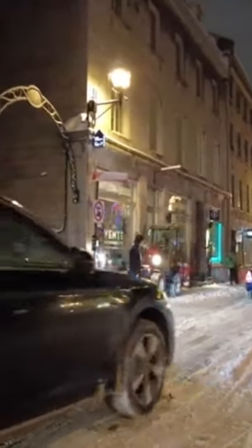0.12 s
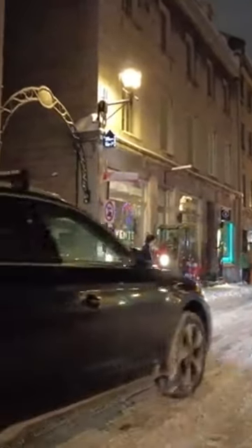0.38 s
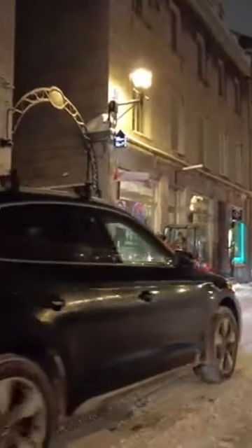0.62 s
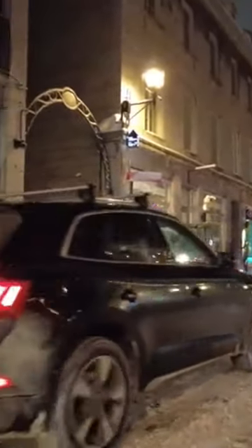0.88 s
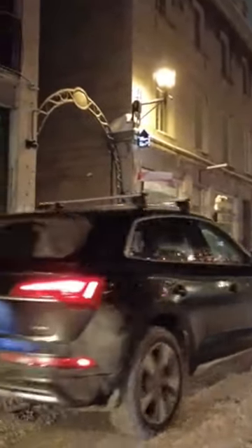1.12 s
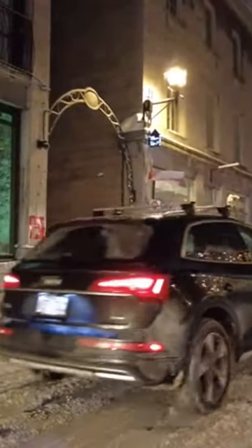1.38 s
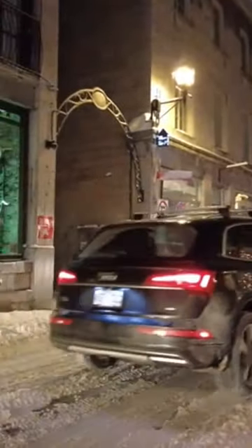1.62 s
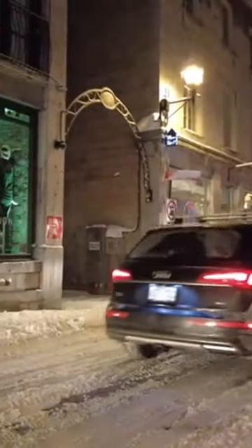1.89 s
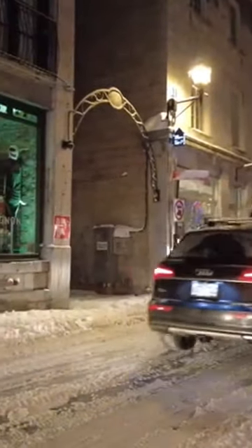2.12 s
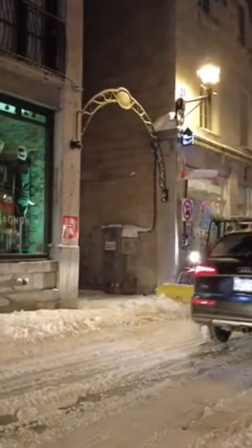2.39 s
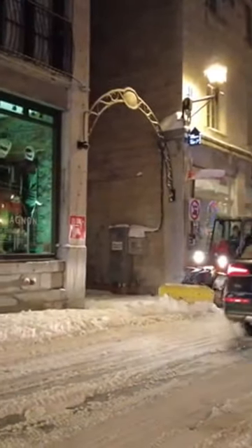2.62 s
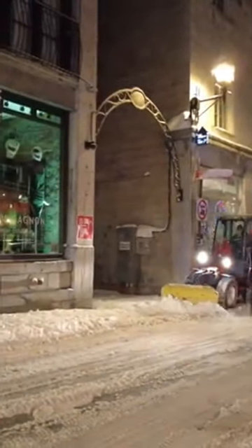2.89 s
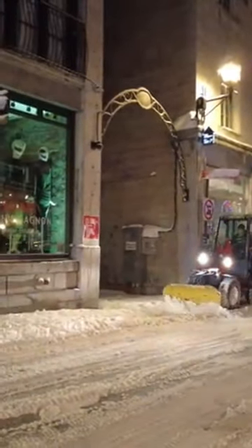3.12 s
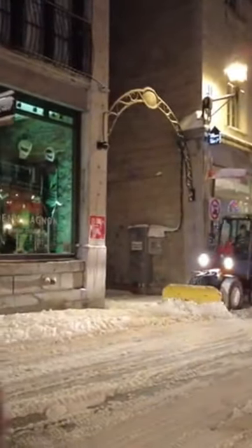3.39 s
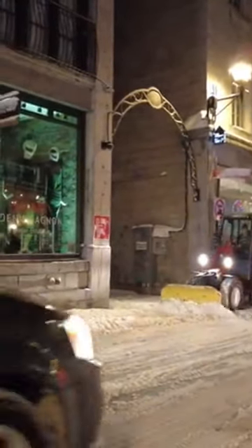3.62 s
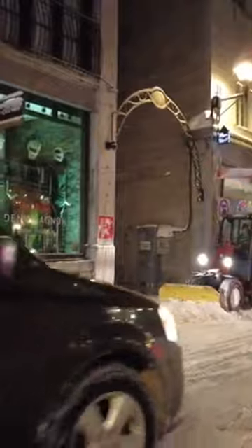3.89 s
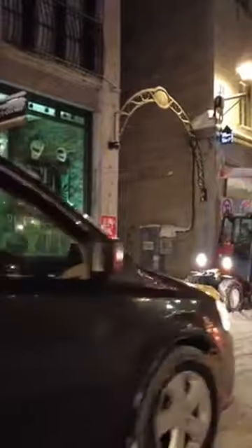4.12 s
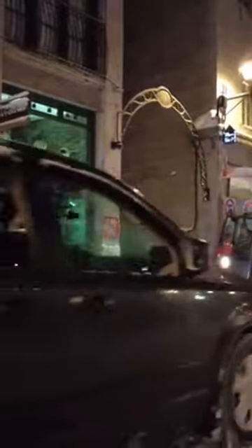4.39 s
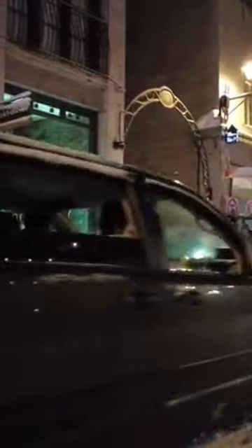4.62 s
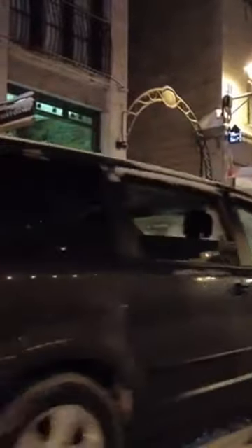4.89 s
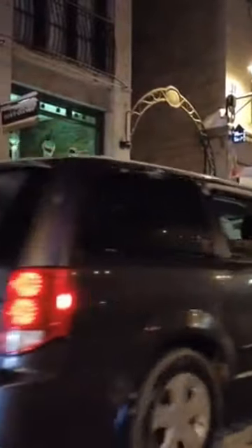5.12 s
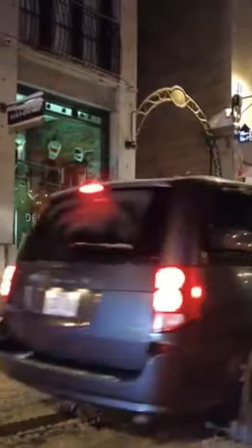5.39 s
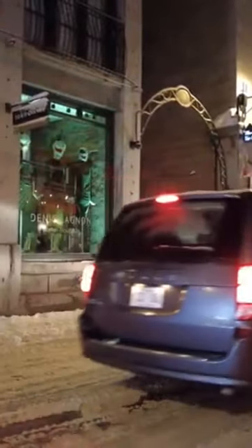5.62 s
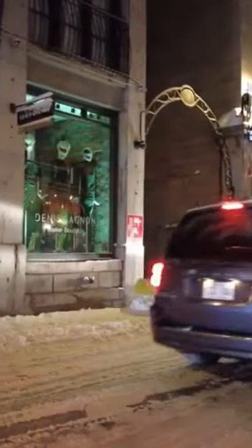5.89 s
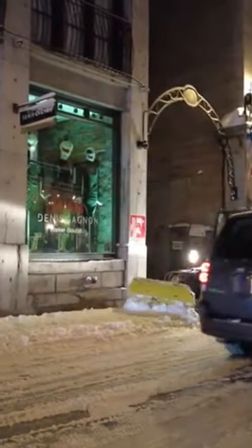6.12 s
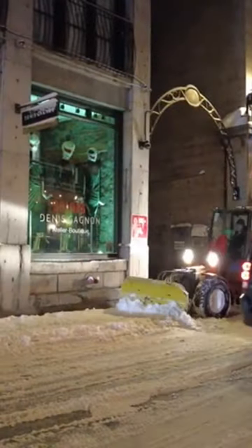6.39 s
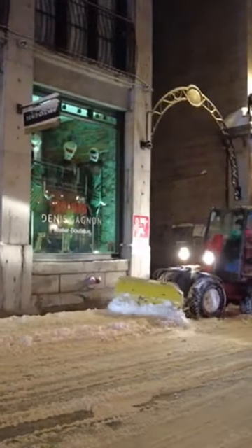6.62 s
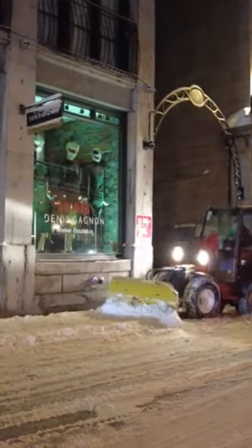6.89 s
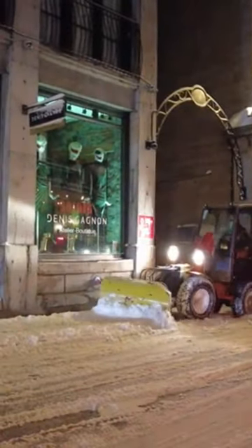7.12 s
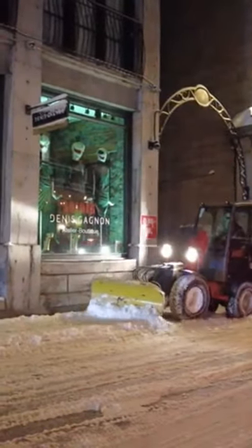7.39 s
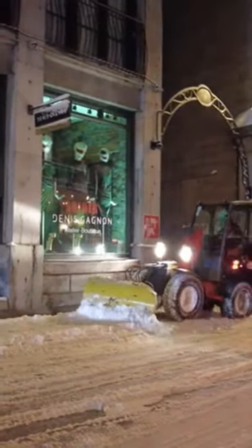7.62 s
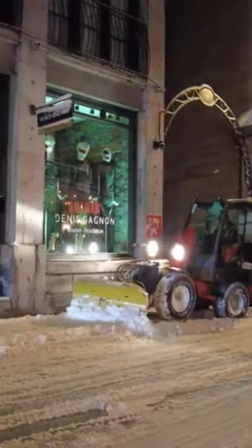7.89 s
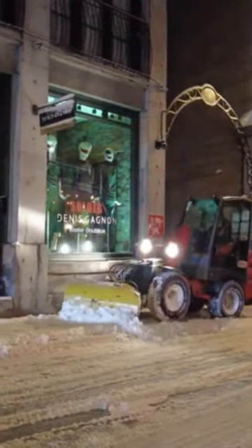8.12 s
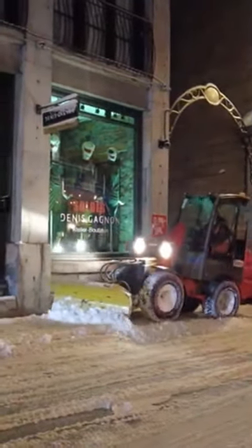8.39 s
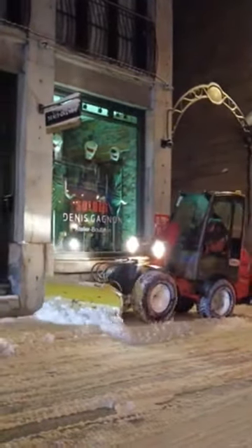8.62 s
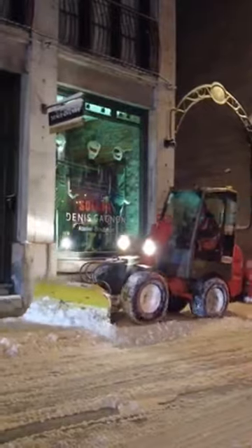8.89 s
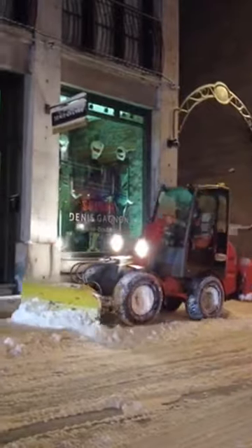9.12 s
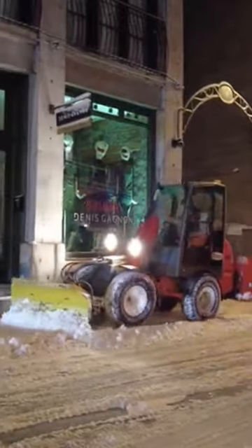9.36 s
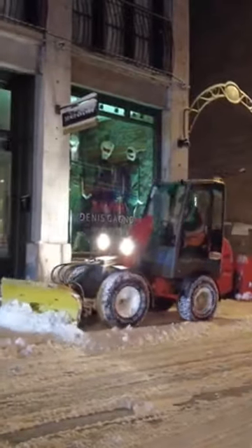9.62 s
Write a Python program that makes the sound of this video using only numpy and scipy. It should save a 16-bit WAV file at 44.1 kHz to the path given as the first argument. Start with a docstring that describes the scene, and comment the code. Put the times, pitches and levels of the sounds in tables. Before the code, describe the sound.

A small diesel plow tractor drones low and steady, clattering nearer over crunching snow while two cars roll closely past on a rumbling street.

```python
"""Snowy pavement between stone walls: a small plow tractor works its way along while two cars roll past.
The exhaust drones in sines on the firing rate and its multiples, over a growl of banded noise.
Noise in step with the firing rings as block clatter; short scrapes ring the steel as the blade knocks the kerb.
Random snaps and hiss make the snow crunch; low banded noise is the street rumble.
Wandering low sines are the first car's idle, a gliding narrow noise is the second car's tyre hum."""
import sys
import numpy as np
from scipy import signal
from scipy.fft import rfft, irfft, next_fast_len
from scipy.io import wavfile

SR = 44100
rng = np.random.default_rng(int(sys.argv[2]) if len(sys.argv) > 2 else 0)


def bounce(signal):
    """Save signal as a 16-bit WAV file at the path given by the first command-line argument."""
    frames = np.transpose(np.atleast_2d(signal))
    limited = np.clip(frames, -1, 1)
    pcm = np.round(limited * 32767).astype(np.int16)
    wavfile.write(sys.argv[1], SR, pcm)


def ratio_of_db(decibels):
    """Turn decibels (scalar or array-like) into linear amplitude factors; 0 dB maps to 1."""
    return 10 ** (np.asarray(decibels, float) / 20)


N = 429975


def rms_one(x):
    """Scale to rms 1."""
    return x / np.sqrt(np.mean(x ** 2) + 1e-20)


def in_time(rows):
    """Columns of a time table, interpolated to every sample."""
    t_s, *columns = np.transpose(rows)
    return [np.interp(np.arange(N) / SR, t_s, column) for column in columns]


def at_hz(points, hz):
    """Value of a frequency table, interpolated on log frequency."""
    table_hz, values = np.transpose(points)
    return np.interp(np.log(hz), np.log(table_hz), values)


def drift(rate_hz):
    """Slow chance of rms 1: noise at every 40th sample through a double one-pole low-pass."""
    r = np.exp(-80 * np.pi * rate_hz / SR)
    noise = rng.standard_normal(N // 40 + 2002)
    slow = signal.lfilter([1], [1, -2 * r, r * r], noise)[2000:]
    return np.interp(np.arange(N) / 40, np.arange(len(slow)), rms_one(slow))


def swelling(rest_db, rows):
    """Resting level plus swells, in dB; swell power is quartered one rise before and one fall after its top."""
    t_s, power = np.arange(0, N + 40, 40) / SR, 0
    for top_s, db, rise_s, fall_s in rows:
        away = (t_s - top_s) / np.where(t_s < top_s, rise_s, fall_s)
        power = power + ratio_of_db(db) ** 2 / (1 + away ** 2) ** 2
    swells = np.interp(np.arange(N) / SR, t_s, power)
    return 10 * np.log10(ratio_of_db(rest_db) ** 2 + swells)


def spread(mid, side, hz):
    """Two unrelated signals become a stereo pair as alike as the microphone ports allow at this pitch."""
    # port likeness: f/Hz, left-right correlation
    port_likeness = [(60, 0.88), (250, 0.95), (500, 0.84), (1050, 0.36), (1250, 0.93), (2000, 0.23),
                     (4400, 0.063), (15000, 0.17)]
    alike = np.clip(at_hz(port_likeness, hz), -.99, .99)
    return np.sqrt(1 + alike) * mid + np.sqrt(1 - alike) * side * np.array([[1], [-1]])


def coloured(source, spectrum, patchy_db):
    """Half-octave bands of a (2, 2, N) source, each with its own level, flicker and stereo width; rms 1."""
    low_hz, high_hz = spectrum[0][0], spectrum[-1][0]
    band_hz = low_hz * 2 ** np.arange(0, np.log2(high_hz / low_hz) + .01, .5)
    out = 0
    for k, (low, high) in enumerate(zip(band_hz, band_hz[1:])):
        band = signal.butter(2, [low, high], "band", fs=SR, output="sos")
        mid, side = signal.sosfilt(band, source[k % 2])  # neighbouring bands are unrelated
        hz = np.sqrt(low * high)
        out = out + ratio_of_db(at_hz(spectrum, hz) + patchy_db * drift(6.0)) * spread(mid, side, hz)
    return rms_one(out)


def resonance(x, hz, width_hz):
    """Two-pole band with gain 1 on top."""
    r = np.exp(-np.pi * width_hz / SR)
    zeros = np.array([1, 0, -1]) * (1 - r * r) / 2
    poles = [1, -2 * r * np.cos(2 * np.pi * hz / SR), r * r]
    return signal.lfilter(zeros, poles, x)


def resonance_twice(x, hz, width_hz):
    """The same band in series with itself, for steeper skirts."""
    return resonance(resonance(x, hz, width_hz), hz, width_hz)


def wavering(cycles, hz):
    """A sine blurred as by echoes off walls and cars: level and phase wander, slowly and in quick flutters."""
    def blurred():
        level_db = 2 * drift(2.5) + 2.5 * drift(8)
        phase = drift(2) + .5 * drift(9)
        return ratio_of_db(level_db) * np.sin(2 * np.pi * cycles + phase)
    return spread(blurred(), blurred(), hz)


def narrow_noise(cycles, width_hz):
    """Noise in a narrow band that follows a moving pitch; rms 1."""
    angle = 2 * np.pi * cycles
    return rms_one(drift(width_hz) * np.cos(angle) + drift(width_hz) * np.sin(angle))


def street_rumble():
    """Low banded noise of the street, swelling now and then."""
    # noise density: f/Hz, relative level/dB per Hz
    rumble_spectrum = [(20, -11.5), (35, 4.5), (70, -2), (110, -7.5), (160, -12.5), (226, -20.5)]
    # swells: t/s, level/dB, rise/s, fall/s
    rumble_swells = [(2.4, -22.5, 0.22, 0.16), (2.9, -23, 0.18, 0.11), (4.25, -22.5, 0.38, .2),
                     (5.3, -24, .3, 0.55), (7.2, -22.5, 0.13, 0.64), (9.75, -20.5, 0.27, .1)]
    noise = rng.standard_normal((2, 2, N))
    return ratio_of_db(swelling(-27.5, rumble_swells)) * coloured(noise, rumble_spectrum, patchy_db=0.5)


def passing_hum():
    """Hollow tyre hum: narrow noise that slides down while the second car rolls by."""
    # hum pitch: t/s, f/Hz
    hum_pitch = [(4.45, 427), (4.95, 264)]
    # hum swell: t/s, gain/dB, rise/s, fall/s
    hum_swell = [(4.72, -38, 0.19, .16)]
    hz, = in_time(hum_pitch)
    cycles = np.cumsum(hz) / SR
    hum = spread(narrow_noise(cycles, 40), narrow_noise(cycles, 40), 300)
    return ratio_of_db(swelling(-90, hum_swell)) * hum


def car_idle():
    """Low throb of the first, nearest car pulling away: one wandering sine that fades out."""
    # idling engine: t/s, f/Hz, level/dB
    idle_course = [(0, 36.6, -35.5), (1.0, 32.43, -28), (2.0, 41.23, -32), (9.75, 41.85, -89.5)]
    hz, db = in_time(idle_course)
    return ratio_of_db(db) * wavering(np.cumsum(hz) / SR, 40)


def whistle(hz, width_hz):
    """Noise through a narrow doubled resonance; rms 1."""
    return rms_one(resonance_twice(rng.standard_normal(N), hz, width_hz))


def whines(clatter_db, turns):
    """Faint fixed electric whistle far above the engine; pump and gears whine in step with the firing."""
    # pump and gear whines: start t/s, end t/s, multiple of firing rate, level/dB
    gear_whines = [(2.2, 3.0, 54, -63), (6.6, 8.15, 48.4, -63), (7.1, 9.0, 59.5, -64.5),
                   (7.3, 8.0, 78.6, -68)]
    under_clatter_db = 32.5
    out = ratio_of_db(clatter_db - under_clatter_db + 3.0 * drift(8.0)) * whistle(14718, 120)
    for start_s, end_s, multiple, db in gear_whines:
        corners_s = [start_s, start_s + 0.11, end_s - .1, end_s]
        sounding = np.interp(np.arange(N) / SR, corners_s, [0, 1, 1, 0])
        out += ratio_of_db(db) * sounding * narrow_noise(multiple * turns, 70)
    return out


def knocks():
    """Blade and chassis knocks: each a short scrape that rings the steel, with a sharp dry rasp on top."""
    # knocks: t/s, ringing gain/dB, rasp gain/dB
    knock_rows = [(2.743, -34, -47), (3.950, -26.5, -58), (7.050, -32.5, -39), (8.769, -34, -37.5)]
    # steel modes: f/Hz, gain/dB, width of one filter pass/Hz
    steel_modes = [(490, -5, 200), (1050, -4, 400), (1520, 0, 380), (2400, -12, 500), (2900, -15, 400),
                   (4400, -26, 200)]
    out, age_s = np.zeros((2, N)), np.arange(round(.3 * SR)) / SR
    scrape_shape = (1 - np.exp(-age_s / .005)) * (np.exp(-age_s / .014) + .4 * np.exp(-age_s / .1))
    rasp_shape = np.exp(-age_s / .007) + .45 * np.exp(-age_s / .03)
    rasp_band = signal.butter(3, [2100, 4700], "band", fs=SR, output="sos")
    for at_s, steel_db, rasp_db in knock_rows:
        chance = rng.standard_normal((2, len(age_s)))
        scrape = chance * scrape_shape
        ringing = sum(ratio_of_db(db) * resonance_twice(scrape, hz, width_hz) for hz, db, width_hz in steel_modes)
        rasp = signal.sosfilt(rasp_band, chance * rasp_shape)
        knock = ratio_of_db(steel_db) * ringing / np.abs(ringing).max() + ratio_of_db(rasp_db) * rasp
        at = round(at_s * SR)
        out[:, at:at + len(age_s)] += spread(*knock, 1900)
    return out


def clods(per_s):
    """Packed snow creaks and breaks: scattered short rings at seven pitches, left and right; rms 1."""
    out = 0
    for hz in np.geomspace(680, 1150, 7):
        breaks = (rng.random((2, N)) < per_s / SR) * rng.standard_normal((2, N))
        out = out + resonance_twice(breaks + 1e-18, hz, 64)
    return rms_one(out)


def snow_crunch(swing_db, snaps_per_s, size_db, snap_share):
    """Snow crystals snap under tyres and blade on a smooth hiss; clods give way among them."""
    # noise density: f/Hz, relative level/dB per Hz
    crunch_spectrum = [(300, 7), (800, -11.5), (2000, -16.5), (4000, -25), (7000, -30.5), (11000, -36.5),
                       (15000, -37), (19500, -36.5)]
    # wheels and blade press through deeper snow: t/s, level/dB, rise/s, fall/s
    deep_snow = [(.4, -42.5, .4, 0.54), (2.8, -38.5, 0.5, 0.41), (3.45, -42.5, 0.17, .3),
                 (4.35, -36.5, 0.19, 0.4), (5.1, -43, 0.27, .6), (7.898, -42.5, .25, .4),
                 (8.75, -43.5, 0.34, .3), (9.6, -41.5, .3, .3)]
    # packed clods give way: t/s, level/dB, rise/s, fall/s
    clod_swells = [(.6, -53, 0.43, 0.3), (2.7, -44.5, 0.45, 0.55), (4.48, -52.5, 0.18, 0.086),
                   (9.699, -47.5, 0.33, .1)]
    blade_db, swing_share, clods_db = -48, .3, -58.5
    shape = (2, 2, N)
    born = rng.random(shape) < snaps_per_s * ratio_of_db(2.0 * drift(20)) / SR
    sizes = rng.laplace(size=shape)
    snaps = rms_one(born * np.sign(sizes) * ratio_of_db(size_db * np.minimum(np.abs(sizes), 5)))
    hiss = rng.standard_normal(shape)
    crunch = coloured(snap_share * snaps + hiss, crunch_spectrum, patchy_db=1.5)
    crunch_db = swelling(blade_db + swing_share * swing_db, deep_snow)
    breaking = ratio_of_db(swelling(clods_db, clod_swells)) * clods(per_s=20.0)
    return ratio_of_db(crunch_db) * crunch + breaking


def tractor_swing():
    """dB by which growl, clatter and crunch grow as the tractor nears and sink behind the cars."""
    # a car hides the tractor: start t/s, end t/s, loss/dB
    car_shadows = [(0.758, 2.078, 6.5), (3.202, 3.95, 0.5), (4.789, 6.91, 3.5)]
    nearing_db_per_s, edge_s = 0.6746, 0.18
    t_s, hidden_db = np.arange(N) / SR, 0
    for start_s, end_s, loss_db in car_shadows:
        corners_s = [start_s, start_s + edge_s, end_s - edge_s, end_s]
        hidden_db = hidden_db + loss_db * np.interp(t_s, corners_s, [0, 1, 1, 0])
    return nearing_db_per_s * t_s - hidden_db


def block_clatter(turns, depth):
    """Combustion knock: noise swelling slightly with every firing, ringing in block and bonnet; rms 1."""
    # block and bonnet bands: f/Hz, width of one filter pass/Hz, relative level/dB
    block_bands = [(1224, 200, -1.5), (1495, 480, -2.5), (2550, 430, -11.5), (2875, 690, -8),
                   (4440, 1800, -20.5), (6170, 4800, -22)]
    firing_swell = 1 + depth * np.cos(2 * np.pi * turns)
    knock = rng.standard_normal((2, N)) * firing_swell * ratio_of_db(1.9 * drift(27))
    out = 0
    for k, (hz, width_hz, db) in enumerate(block_bands):
        # doubled bands keep the valleys between them dark
        mid, side = resonance_twice(knock, hz, width_hz) / np.sqrt(width_hz)
        out = out + (-1) ** k * ratio_of_db(db + drift(4.3)) * spread(mid, side, hz)
    return rms_one(out)


def engine_growl():
    """Rough engine noise in patchy half-octave bands; rms 1."""
    # noise density: f/Hz, relative level/dB per Hz
    growl_spectrum = [(110, -15.5), (156, -5.5), (345, -20), (470, -16.5), (700, -38.5), (1000, -32.5),
                      (1250, -53)]
    return coloured(rng.standard_normal((2, 2, N)), growl_spectrum, patchy_db=3.0)


def exhaust(firing_hz, turns, growl_db):
    """Clean sines on the firing phase, the lowest two reshaped by their echo, and blurred higher orders."""
    # drone on the direct path: t/s, level/dB
    drone_course = [(0, -17.5), (.82, -14.5), (2.12, -17.5), (2.78, -20), (3.07, -13.5), (4.53, -14),
                    (5.1, -19), (5.18, -16), (6.08, -12.5), (6.92, -15), (7.6, -22), (7.86, -18.5),
                    (7.97, -11.5), (8.36, -16.5), (8.45, -14), (8.55, -18), (8.77, -13.5), (9.6, -17.5)]
    # detour of one strong echo, probably off walls and cars: t/s, detour/m
    echo_detour = [(0.08, 1.95), (0.26, 1.7), (0.38, 2.31), (0.92, 3.38), (2.08, 2.31), (2.71, 2.34),
                   (3.12, 2.51), (4.15, 1.81), (4.33, 2.36), (4.55, 1.84), (4.65, 2.38), (5.05, 2.17),
                   (5.21, 3.24), (6.05, 1.85), (6.57, 2.46), (7.37, 2.7), (8.03, 2.31), (8.27, 2.11),
                   (8.49, 3.03), (8.68, 1.99), (9.39, 2.74)]
    # higher orders between swells, the third first: multiple of firing rate, level/dB
    resting_orders = [(3, -40.5), (4, -43.5), (8, -54.5), (9, -53)]
    # swells of single orders: multiple of firing rate, t/s, level/dB, rise/s, fall/s
    order_swells = [(3, 0.35, -30, 0.51, 0.96), (4, 0.82, -35.5, .25, 0.33), (9, 0.46, -50, 0.39, 0.54),
                    (3, 2.6, -29.5, 0.11, 0.54), (8, 3.0, -40.5, 0.31, 0.27), (3, 3.9, -33, 0.23, 0.68),
                    (3, 2.8, -27.5, .2, 0.14), (4, 3.7, -37, 0.3, 0.21), (3, 5.25, -28, 0.2, .5),
                    (4, 5.32, -33.5, 0.25, 0.14), (3, 7.45, -30, 0.38, 0.13), (9, 7.7, -41.5, .5, 0.72),
                    (3, 8.0, -28.5, 0.17, 0.23), (8, 7.8, -40.5, 0.26, 0.55), (8, 10, -40.5, 0.95, 0.36),
                    (3, 8.5, -31.5, 0.33, .5), (9, 9.25, -38, 1, 0.43), (4, 9.75, -29, 0.25, .1)]
    # weaker orders: multiple of firing rate, level re growl/dB
    weak_orders = [(4.5, -5.5), (5, -9.5), (6, -12.5), (12, -20)]
    echo_share, sound_m_per_s = 0.79, 343
    (drone_db,), (detour_m,) = in_time(drone_course), in_time(echo_detour)
    lag = 2 * np.pi * firing_hz * detour_m / sound_m_per_s
    heights = []
    for k in (1, 2):
        echo_gain = np.abs(1 + echo_share * np.exp(1j * k * lag))
        heights.append(ratio_of_db(drone_db + 0.29 * drift(10.0)) * echo_gain)

    swelling_orders = []
    for multiple, rest_db in resting_orders:
        rows = [row[1:] for row in order_swells if round(row[0]) == round(multiple)]
        swelling_orders.append((multiple, swelling(rest_db, rows)))
    (_, third_db), *higher = swelling_orders
    heights.append(ratio_of_db(third_db))

    out = 0
    for k, (height, lean_db) in enumerate(zip(heights, (.8, .2, .1))):
        sine = np.sqrt(2) * height * np.sin(2 * np.pi * (k + 1) * turns - k)
        out = out + sine * ratio_of_db([[-lean_db], [lean_db]])  # leans to the right
    for multiple, db in higher + [(multiple, growl_db + db) for multiple, db in weak_orders]:
        out = out + ratio_of_db(db) * wavering(multiple * turns, 50 * multiple)
    return out


def scene():
    """Sum of all sources; firing phase, nearing and load tie the tractor's noises together."""
    # engine speed: t/s, firing f/Hz
    firing_course = [(0, 50.35), (1.9, 50.41), (3.2, 49.62), (5.1, 50.05), (6.0, 50.81), (6.88, 51.14),
                     (7.2, 52.64), (7.7, 53.54), (7.87, 53.09), (8.09, 50.46), (8.38, 51.07), (8.57, 52.9),
                     (9.75, 50.97)]
    # growl surges under load: t/s, level/dB, rise/s, fall/s
    load_surges = [(2.85, -38, 0.43, .3), (6.5, -38, .6, .5), (7.75, -30.5, 0.28, 0.76),
                   (9.75, -30.5, .4, .1)]
    growl_start_db, growl_swing_share = -40.5, 0.68
    clatter_start_db, clatter_load_share = -52, 0.4
    firing_hz, = in_time(firing_course)
    turns = np.cumsum(firing_hz) / SR  # firings so far
    swing_db = tractor_swing()
    unloaded_db = growl_start_db + growl_swing_share * swing_db
    growl_db = swelling(unloaded_db, load_surges)
    clatter_db = clatter_start_db + swing_db + clatter_load_share * (growl_db - unloaded_db)

    cars = passing_hum() + car_idle()
    snow = snow_crunch(swing_db, snaps_per_s=2500, size_db=3.5, snap_share=.5)
    clatter = ratio_of_db(clatter_db) * block_clatter(turns, depth=0.067)
    growl = ratio_of_db(growl_db) * engine_growl()
    engine = clatter + growl + exhaust(firing_hz, turns, growl_db)
    return street_rumble() + cars + whines(clatter_db, turns) + knocks() + snow + engine


def low_pass(x):
    """Removes everything above the highest recorded frequency."""
    return signal.sosfilt(signal.butter(12, 15490, fs=SR, output="sos"), x)


def record(dry):
    """Two ports differ in phase as a spaced pair; peaks round off at a ceiling, the last instant eases out."""
    # left lags below 1.2 kHz, in phase above: f/Hz, left lead/rad
    port_lead = [(0, 0), (300, -.5), (1000, -3.1), (1185, -3.9), (1205, 0)]
    ceiling = 0.82
    fft_size = next_fast_len(N + 4096)
    lead = np.interp(np.arange(fft_size // 2 + 1) * SR / fft_size, *np.transpose(port_lead))
    turned = rfft(dry, fft_size) * np.exp(.5j * lead * np.array([[1], [-1]]))
    ports = irfft(turned, fft_size)[:, :N]
    rounded = ports / (1 + np.abs(ports / ceiling) ** 8) ** (1 / 8)
    ease_out = np.minimum(1, np.arange(N, 0, -1) / 200)
    return low_pass(rounded * ease_out)


dry = scene()
out = record(dry)
bounce(out)
```